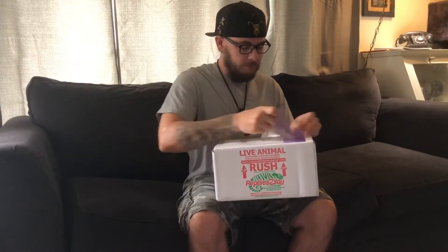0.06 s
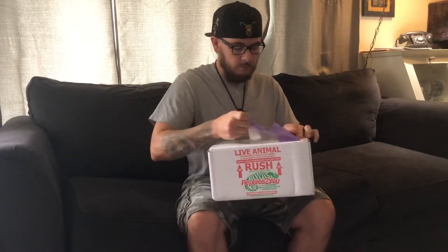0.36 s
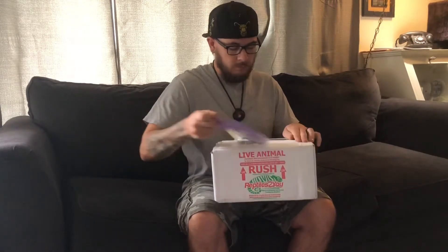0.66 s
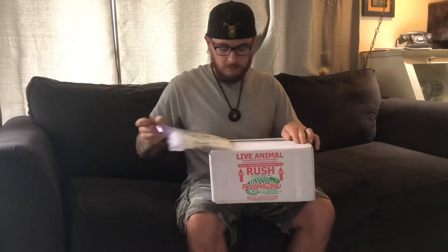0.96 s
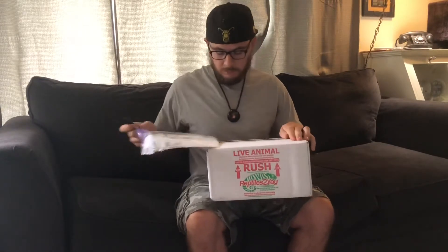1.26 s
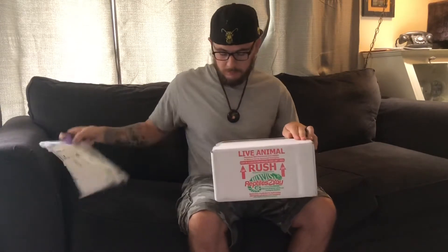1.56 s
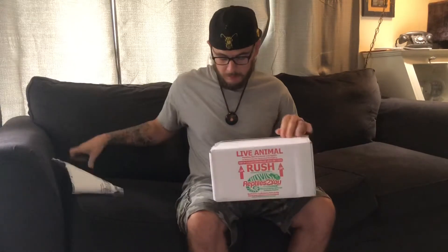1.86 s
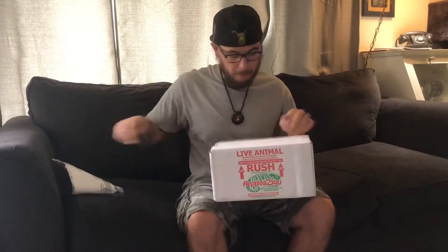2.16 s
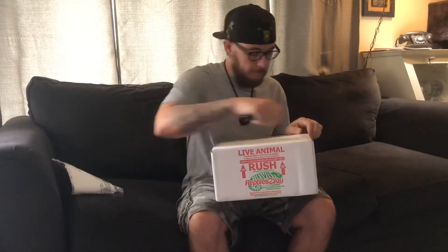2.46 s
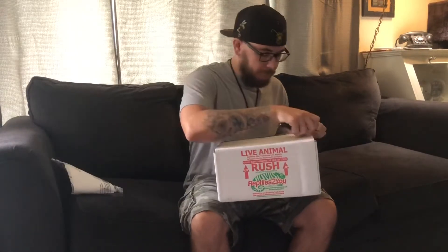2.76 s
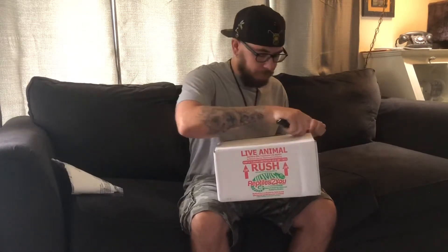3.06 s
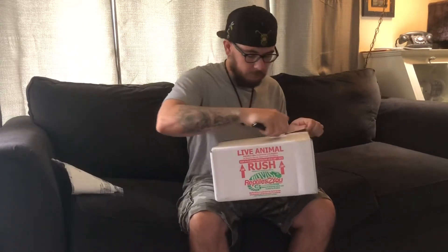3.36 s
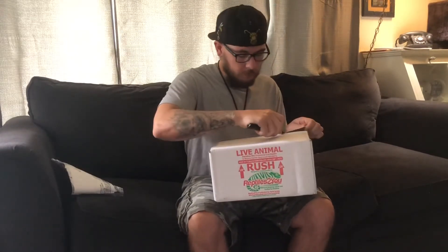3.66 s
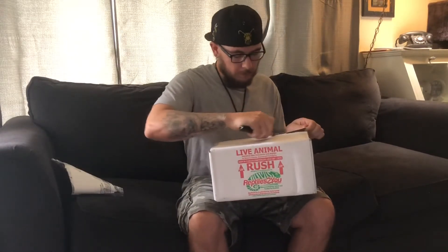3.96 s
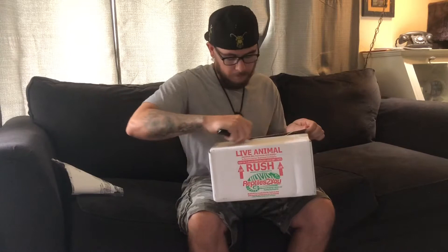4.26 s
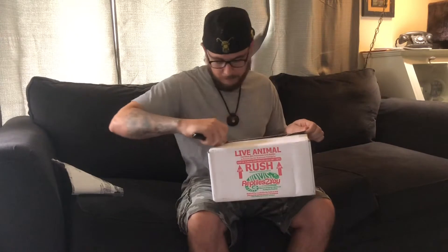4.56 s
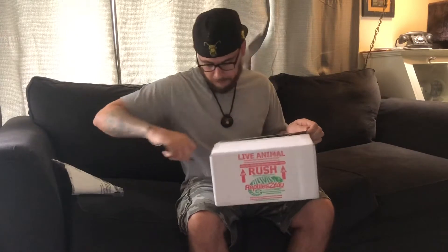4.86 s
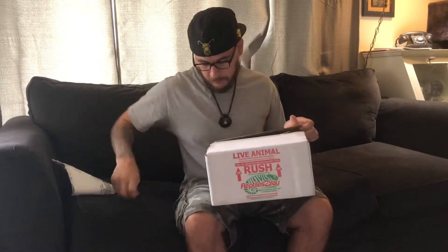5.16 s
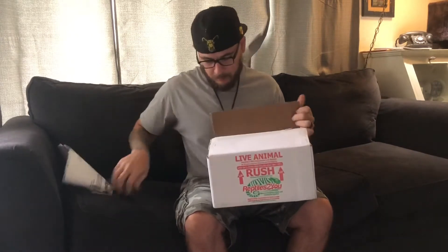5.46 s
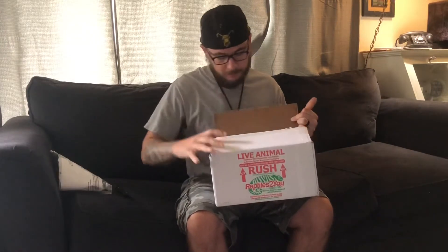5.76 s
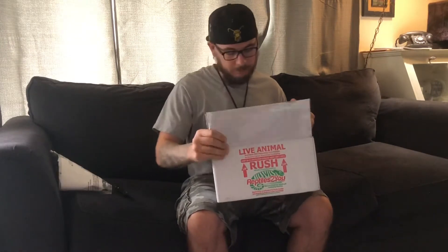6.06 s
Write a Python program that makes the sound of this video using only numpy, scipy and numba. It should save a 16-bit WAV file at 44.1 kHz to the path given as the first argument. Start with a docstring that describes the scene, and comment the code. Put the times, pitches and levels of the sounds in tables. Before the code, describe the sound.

In a small, quiet room, a loud crackling rip of packing tape shakes a cardboard box. A plastic pouch is tossed softly onto a cushion, then a folding knife locks open with a click. The blade ticks, squeaks and rasps along the taped seam until it gives with sharp snaps and hollow thumps. Palms slide lightly over the flaps. The sound is mono, with a short echo and a faint electrical hum.

```python
"""Opening a cardboard box

On a sofa in a small room, packing tape and a plastic pouch are ripped off a box; the glue crackles
as its threads snap. The pouch is tossed aside. A pocket knife clicks open, picks at the seam and
slits it. The last tape snaps, a flap pops up and hands slide over the card. Ripping and scraping
also shake the hollow box. One microphone hears it all, with a short echo and a low mains hum."""
import sys
import numpy as np
from scipy import signal
from scipy.fft import rfft, irfft
from scipy.io import wavfile
from numba import njit

SR = 44100
rng = np.random.default_rng(int(sys.argv[2]) if len(sys.argv) > 2 else 0)


def log_audio(samples):
    """Write samples as a 16-bit WAV file to the path given in sys.argv[1]."""
    # one column per channel
    frames = np.atleast_2d(samples).T
    # limit to full scale, then quantise
    limited = np.clip(frames, -1, 1)
    pcm = np.round(limited * 32767).astype(np.int16)
    wavfile.write(sys.argv[1], SR, pcm)


N = 269010
T = np.arange(N) / SR

# Levels are relative. A "share" is the width of a resonance divided by its frequency.
# the tone of each noise, from bass to treble: f/Hz, level/dB
AIR_TONE = [(12, -33.5), (20, -23), (134, -7), (172, -15.5), (310, -14.5), (388, -19), (459, -22),
            (923, -27), (1220, -25.5), (1910, -31.5), (2200, -32.5), (6360, -39.5), (7950, -41.5),
            (16000, -47.5)]
TAPE_TONE = [(300, -19.5), (1200, -4.5), (2300, -2), (3500, -1), (4600, -1.5), (5600, -3), (7500, -1.5),
             (10000, -4), (16000, -25.5)]
FIZZ_TONE = [(1500, -38), (5000, -21.5), (8200, 14.5), (11000, 9), (16000, 0)]
PLASTIC_TONE = [(300, 14), (800, 2.5), (1400, 4.5), (2200, 1.5), (4500, 1), (8000, -1.5), (12000, -4),
                (16000, -8)]
CUSHION_TONE = [(200, -6), (550, 6), (900, -0.5), (2000, -1), (3300, -7), (7000, -10.5), (11000, -15.5),
                (16000, -25)]
CARD_TONE = [(300, -27), (900, -4), (1250, 10), (1500, 13.5), (1900, 8), (5000, 5.5), (8000, 3.5),
             (12000, -1), (16000, -1)]
BLADE_TONE = [(300, -27.5), (1500, -4), (3800, -3.5), (5300, -6), (8200, -3.5), (11000, -8), (16000, -9)]
# mains hum: f/Hz, level/dB
HUM_TONES = [(59.7, -64.5), (120, -59.5), (239.5, -64.5)]
# resonances of the air and walls of the box: f/Hz, width/Hz, level/dB
HOLLOW_RINGS = [(121, 16, -14.5), (189, 35.4, 0.5)]
# resonances of the lid and of the taut tape strip: multiple of the main frequency, share, level/dB
LID_RINGS = [(1, 0.74, 6.5), (1.242, 0.18, -11), (2.701, 0.13, -3)]
STRIP_RINGS = [(0.996, 0.91, 4), (1.901, 1.0, -1)]
# how hard the tape is pulled, as the strength of its crackle: t/s, level/dB
TAPE_PULL = [(0, -21), (.06, -25), (.11, -29.5), (.135, -29.5), (.19, -28), (.26, -24), (.32, -23.5),
             (.35, -27), (.44, -23.5), (.55, -21.5), (.63, -22.5), (.86, -27.5), (.92, -28.5), (.97, -34.5),
             (1.13, -32.5), (1.21, -26.5), (1.268, -27.5)]
# the strip's pitch sinks as it grows longer and rises as it is drawn taut: t/s, f/Hz
STRIP_PITCH = [(0, 1280), (.3, 1670), (.47, 1750), (.66, 1110), (.86, 720), (1.2, 1800)]
# the lid's pitch follows the spot where the tape pulls or the blade cuts: t/s, f/Hz
PULLED_LID_PITCH = [(0, 360), (.33, 357), (.54, 410), (.72, 315), (.93, 332), (1.12, 422)]
CUT_LID_PITCH = [(3.9, 309), (4.55, 376)]
# tugs and nudges that shake the box: t/s, level/dB
TUGS = [(0, -24), (.125, -35.5), (.25, -27.5), (.615, -34), (1.207, -36.5), (2.611, -50), (4.988, -54),
        (5.355, -50)]
# clicks of tape, pouch and knife: t/s, level/dB, f/Hz, rough fade time/s
SHARP_CLICKS = [(0.1257, -10, 4000, 0.013), (0.2527, -0.5, 4500, 0.0054), (0.358, -3, 4070, .012),
                (.446, 2.5, 3600, 0.015), (.49, 1.5, 3250, 0.028), (0.9905, -8.5, 6000, 0.0062),
                (1.083, -5, 4620, 0.004), (1.457, -28.5, 6900, 0.0075), (1.5296, -27.5, 6000, 0.0062),
                (1.621, -27.5, 6570, .007), (2.415, -24, 5130, 0.011), (2.5269, -28, 3220, 0.02),
                (3.024, -27, 5060, 0.0057), (3.0734, -25, 4300, 0.039), (3.185, -27.5, 6950, 0.021),
                (3.2386, -28, 8000, 0.0077), (3.4593, -36, 6000, 0.02), (4.602, -16, 6950, 0.033),
                (4.9848, -44, 8900, 0.024), (5.129, -30.5, 6860, 0.088), (5.3584, -30, 1800, 0.012)]
# tape, blade or flap catches and squeals just below f: t/s, level/dB, half length/s, f/Hz, share
SQUEALS = [(0.303, -23.5, 0.019, 4040, 0.35), (0.52, -39, 0.017, 3430, 0.86),
           (3.323, -46.5, 0.027, 3140, 0.44), (3.503, -52, 0.012, 2320, 0.89),
           (3.874, -37, 0.0084, 3280, .18), (4.023, -32, 0.0045, 3280, 0.22),
           (5.911, -53.5, 0.021, 6430, 1.1)]
# the pouch lands on the cushion and is pushed on once: t/s, length/s, level/dB
POUCH_SKIDS = [(1.914, 0.052, -47.5), (1.989, 0.034, -44.5)]
# blade and handle ring as the knife locks open: f/Hz, level/dB, time to fade by 60 dB/s
LOCK_RINGS = [(1520, -2, .04), (2050, -5, .015), (2620, -1, .015), (3400, -3, .012), (4300, -1, .012)]
# hand and knife strokes: t/s, length/s, rise time/s, rubbing level/dB, pressing level/dB
HAND_STROKES = [(2.505, 0.069, 0.021, -60.5, -47), (2.58, 0.15, .015, -65.5, -66),
                (2.75, 0.081, 0.055, -62.5, -65), (4.73, 0.073, 0.025, -61.5, -48.5),
                (5.27, 0.14, 0.035, -62, -56), (5.525, 0.061, 0.032, -62, -43.5),
                (5.72, 0.15, 0.046, -58, -51.5), (5.83, 0.086, 0.057, -55, -55),
                (5.97, 0.095, 0.028, -63.5, -61)]
KNIFE_STROKES = [(2.94, 0.3, 0.11, -53, -56), (3.175, 0.1, 0.0065, -49, -55),
                 (3.29, 0.068, 0.041, -49, -42.5), (3.47, 0.048, 0.039, -48, -43),
                 (3.70, .14, 0.075, -56, -53), (3.825, 0.069, 0.029, -42, -39.5),
                 (3.91, 0.76, 0.017, -46, -44.5)]
# resonances of the cut card edge: f/Hz, share, level/dB
EDGE_RINGS = [(960, 1, -7), (1404, 0.44, 6), (1860, 0.87, 16), (3050, 0.23, 6)]
# the seam gives way: t/s, crack level/dB, crack f/Hz, lid level/dB, lid f/Hz, boom level/dB
SEAM_POPS = [(4.0251, -15, 2900, -18.5, 480, -45), (4.651, -12, 4770, -19, 370, -18.5),
             (5.146, -16, 7140, -17, 430, -25.5)]
# the blade flicks free of the tape: t/s, level/dB
BLADE_FLICKS = [(4.5958, 1.5), (4.606, -12)]
LID_HZ = 353  # the lid's pitch when it is rubbed or nudged


def undb(db):
    """Turn decibels into a factor to multiply a sound by."""
    return 10 ** (np.asarray(db) / 20)


def unit(x):
    """Scale a sound to an average (rms) strength of 1."""
    return x / np.sqrt(np.mean(x ** 2))


def add(out, s, sound):
    """Mix a short sound in at s seconds."""
    start = max(int(s * SR), 0)
    out[start:start + len(sound)] += sound[:N - start]


def colour(x, tone, size=1024):
    """Shape the bass and treble of a sound with a tone table; the result has strength 1."""
    hz, db = np.transpose(tone)
    f = np.maximum(np.fft.rfftfreq(size, 1 / SR), 1)
    gain = undb(np.interp(np.log(f), np.log(hz), db))
    # build the filter so that it never rings ahead of the sound
    cepstrum = irfft(np.log(gain))
    cepstrum[1:size // 2] *= 2
    cepstrum[size // 2 + 1:] = 0
    response = irfft(np.exp(rfft(cepstrum)))
    return unit(signal.oaconvolve(x, response)[:N])


@njit
def band_pass(x, tuning, share):
    """Let one band of frequencies through; its centre can move."""
    out, band, low = np.empty(len(x)), 0., 0.
    for i in range(len(x)):
        g = tuning[i]
        now = (band + g * (x[i] + 1e-18 - low)) / (1 + g * (g + share))
        band, low = 2 * now - band, low + 2 * g * now
        out[i] = share * now
    return out


def resonate(x, hz, share):
    """One resonance: the sound rings around hz, for longer if the share is small."""
    tuning = np.tan(np.pi * np.minimum(hz / SR, .45))
    return band_pass(x, tuning * np.ones(len(x)), float(share))


def resonate_twice(x, hz, share):
    """A steeper resonance that lets less through far from hz."""
    return resonate(resonate(x, hz, share), hz, share)


def wander(rate):
    """Drift at random, mostly between -1 and 1, to a new value rate times a second."""
    points = rng.standard_normal(N // 20)
    return np.interp(T * rate, np.arange(len(points)), points)


def crackle(rate, spread_db, judder_rate=12, judder_db=0):
    """Tiny snaps of uneven size, about rate a second; sticking and slipping (judder) bunches them."""
    happens = rng.random(N) < rate / SR
    size = undb(spread_db * np.minimum(rng.exponential(size=N), 4))
    sign = rng.choice([-1, 1], N)
    judder = undb(judder_db * wander(judder_rate))
    return unit(happens * size * sign * judder)


def burst(fade_s, rise=0.023):
    """A crack made of noise; the longer it lasts, the softer it starts."""
    t = T[:SR // 4]
    fade = np.exp(-np.log(1000) * t / fade_s)
    noise = 0.53 * rng.standard_normal(len(t)) * fade
    noise[0] = 1.76
    even = irfft(np.exp(1j * np.angle(rfft(noise))), len(t))  # all frequencies equally strong
    onset = 1 - np.exp(-(t + 1 / SR) / (rise * fade_s))
    crack = even * fade ** (1 / 4) * onset
    return crack * np.linalg.norm(noise) / np.linalg.norm(crack)


def gesture(s, length, rise_s, fall_s):
    """A movement that swells from time s, holds until its length is over, then dies away."""
    swell = np.sin(np.pi / 2 * np.clip((T - s) / rise_s, 0, 1)) ** 2
    return swell * np.exp(-np.maximum(T - s - length, 0) / fall_s)


def strokes(table, fall_s):
    """Two loudness curves for a series of strokes: rubbing and pressing."""
    shapes = np.array([gesture(s, length, rise_s, fall_s) for s, length, rise_s, _, _ in table])
    gains = undb(np.array(table)[:, 3:].T)
    return np.sqrt(gains ** 2 @ shapes ** 2)


def sheet(x, rings, hz):
    """A stretched sheet rings at several multiples of hz."""
    return sum(undb(db) * resonate_twice(x, hz * multiple, share) for multiple, share, db in rings)


def hollow(x):
    """The air and walls of the box boom."""
    return sum(undb(db) * resonate(x, hz, width / hz) for hz, width, db in HOLLOW_RINGS)


def box(x, lid_hz, hollow_db):
    """The lid bends and the hollow booms as the box is shaken; card soaks up the treble."""
    body = unit(sheet(x, LID_RINGS, lid_hz)) + undb(hollow_db) * unit(hollow(x))
    muffle = signal.butter(2, [90, 950], "bandpass", fs=SR, output="sos")
    return unit(signal.sosfilt(muffle, body))


def background():
    """Still room air and the hum of an appliance, there from the start."""
    air = undb(-55.5) * colour(rng.standard_normal(N), AIR_TONE, size=4096)
    hum = sum(undb(db) * np.sqrt(2) * np.sin(2 * np.pi * hz * T) for hz, db in HUM_TONES)
    return air + hum


def pulled(db, growth):
    """Loudness of one part of the rip: db at a firm pull, plus growth dB for each extra dB of pull."""
    firm_db, let_go_db_per_s = -22.5, 389
    times, pull_db = np.transpose(TAPE_PULL)
    extra_db = np.interp(T, times, pull_db) - firm_db
    since_free = np.maximum(T - times[-1], 0)
    return undb(db + growth * extra_db - let_go_db_per_s * since_free)


def tape():
    """Glue threads snap by the thousand, a few loudly; the strip and the box pass it on to the air."""
    snaps = crackle(rate=7000, spread_db=4, judder_rate=170, judder_db=1.56)
    big_snaps = crackle(rate=60, spread_db=2)
    rip = pulled(db=-22.5, growth=1.06) * colour(snaps, TAPE_TONE)
    rip += pulled(db=-34, growth=0.98) * colour(big_snaps, TAPE_TONE)
    brighten = undb(1.5 * T)  # the rip turns brighter as it runs on
    fizz = pulled(db=-23, growth=1.075) * brighten * colour(snaps, FIZZ_TONE)
    strip_hz = np.interp(T, *np.transpose(STRIP_PITCH))
    length_gain = (1337 / strip_hz) ** 2.6  # a longer, lower strip is louder
    strip = pulled(db=-35.5, growth=2.1) * length_gain * unit(sheet(snaps, STRIP_RINGS, strip_hz))
    lid_hz = np.interp(T, *np.transpose(PULLED_LID_PITCH))
    body = pulled(db=-34.5, growth=0.71) * box(snaps, lid_hz, hollow_db=-6.5)
    return rip + fizz + strip + body


def jolts():
    """The box shudders briefly at each tug or nudge."""
    shake = sum(undb(db) * gesture(s, length=0.0052, rise_s=0.0052, fall_s=0.025) for s, db in TUGS)
    return shake * box(rng.standard_normal(N), LID_HZ, hollow_db=-2.5)


def clicks():
    """Small stiff things let go, each with its own brightness."""
    out = np.zeros(N)
    for s, db, hz, fade_s in SHARP_CLICKS:
        add(out, s, undb(db) * resonate_twice(burst(fade_s), hz, share=1.6))
    return out


def squeals():
    """Tape, blade or flap sticks and slips for a moment, ringing one resonance."""
    out = np.zeros(N)
    slips = crackle(rate=2000, spread_db=10, judder_rate=380, judder_db=-5)
    for s, db, half_length, hz, share in SQUEALS:
        swell = np.exp(-((T - s) / half_length) ** 2)
        out += undb(db) * swell * unit(resonate_twice(slips, 0.98 * hz, share))
    return out


def pouch():
    """Thin plastic crinkles as it swings, then skids to rest on the cushion with a sinking flutter."""
    swing_s, land_s = 1.37, 1.922
    creases = crackle(rate=900, spread_db=1.5, judder_rate=120, judder_db=2)
    swing = gesture(swing_s, length=0.467, rise_s=0.047, fall_s=0.02)
    crinkle = undb(-54.5) * swing * colour(creases, PLASTIC_TONE)
    slide = crackle(rate=6000, spread_db=3, judder_rate=120, judder_db=2.5)
    skids = sum(undb(db) * gesture(s, length, rise_s=0.018, fall_s=0.022)
                for s, length, db in POUCH_SKIDS)
    swish = skids * colour(slide, CUSHION_TONE)
    landing = gesture(land_s, length=0.12, rise_s=0.038, fall_s=0.081)
    flutter_hz = 195.65 + 217.5 * np.exp(-np.maximum(T - land_s, 0) / 0.15)
    flutter = undb(-44) * landing * unit(resonate_twice(slide, flutter_hz, share=0.51))
    return crinkle + swish + flutter


def knife_lock():
    """The blade snaps into its lock and rings briefly."""
    out = np.zeros(N)
    t = T[:SR // 4]
    ring = sum(undb(db) * np.sin(2 * np.pi * hz * t) * np.exp(-np.log(1000) * t / fade_s)
               for hz, db, fade_s in LOCK_RINGS)
    add(out, s=2.4151, sound=undb(-42) * ring)
    return out


def hands():
    """Palms and flaps brush over the card; pressing on it shakes the box."""
    rub, press = strokes(HAND_STROKES, fall_s=0.025)
    grain = crackle(rate=5600, spread_db=4.5, judder_rate=84, judder_db=3.5)
    ticks = crackle(rate=30, spread_db=2)  # fingertips catch on the card
    swish = undb(2) * rub * colour(grain + undb(-11) * ticks, CARD_TONE)
    return swish + undb(-5.5) * press * box(grain, LID_HZ, hollow_db=3)


def knife_cuts():
    """The blade parts tape and paper in a gritty rasp; pressing brings out the card edge and the box."""
    rub, press = strokes(KNIFE_STROKES, fall_s=0.017)
    fibres = crackle(rate=9000, spread_db=3, judder_rate=200, judder_db=3)
    pitch_drift = np.exp(0.012 * wander(29))  # the edge stiffens and slackens under the blade
    edge = unit(sheet(fibres, EDGE_RINGS, pitch_drift))
    lid_hz = np.interp(T, *np.transpose(CUT_LID_PITCH))
    body = box(fibres, lid_hz, hollow_db=-3)
    ticks = crackle(rate=50, spread_db=2)  # now and then a thicker fibre gives way
    rasp = undb(1) * rub * colour(fibres + undb(-10.5) * ticks, BLADE_TONE)
    return rasp + press * (body + undb(-10) * edge)


def pops():
    """The seam cracks, then the freed lid swings and the box booms."""
    out = np.zeros(N)
    lag_s, push_s = 0.002, 0.0003  # the lid gets a short push just after the crack
    push = np.exp(-((T[:SR // 4] - lag_s) / push_s) ** 2)
    boom = hollow(push)
    for s, crack_db, crack_hz, lid_db, lid_hz, boom_db in SEAM_POPS:
        crack = burst(0.026, rise=0.0061)
        paper_knock = undb(2.5) * resonate(crack, hz=1480, share=1)
        free_ring = undb(13.5) * resonate_twice(push, lid_hz, share=0.4)  # a free lid rings longer
        swing = sheet(push, LID_RINGS, lid_hz) + free_ring
        add(out, s, undb(crack_db) * (resonate(crack, crack_hz, share=1.5) + paper_knock))
        add(out, s, undb(lid_db) * swing / np.abs(swing).max())
        add(out, s, undb(boom_db) * boom / np.abs(boom).max())
    return out


def flicks():
    """The thin blade springs back with a very short, high ping."""
    out = np.zeros(N)
    for s, db in BLADE_FLICKS:
        add(out, s, undb(db) * resonate(burst(0.003), hz=13600, share=0.69))
    return out


def reflections(fades_s):
    """A dense echo; bass, middle and treble each take their own time to fade by 60 dB."""
    t = T[:SR // 2]
    f = np.fft.rfftfreq(len(t), 1 / SR)
    noise = np.exp(2j * np.pi * rng.random(len(f)))
    bands = (f < 700, (f >= 700) & (f < 6000), f >= 6000)
    tail = sum(irfft(noise * band, len(t)) * np.exp(-np.log(1000) * t / fade_s)
               for band, fade_s in zip(bands, fades_s))
    tail *= np.clip(t / 0.0015, 0, 1)
    return tail / np.linalg.norm(tail)


def room(x, echo_db, fades_s, paths=4):
    """Near walls echo, softened by sofa and curtains; moving hands and flaps shift the echo paths."""
    weights = np.array([wander(25) for _ in range(paths)])
    weights /= np.linalg.norm(weights, axis=0)
    echo = sum(signal.oaconvolve(x * weight, reflections(fades_s))[:N] for weight in weights)
    return (x + undb(echo_db) * echo) / np.hypot(1, undb(echo_db))


def scene():
    """All the sounds together in the room, the same in both channels."""
    facing = flicks() + undb(-1) * pops()  # blade and lid also send sound straight at the microphone
    handling = tape() + pouch() + knife_lock() + knife_cuts() + hands() + jolts() + squeals() + clicks()
    in_room = room(handling + facing, echo_db=-2, fades_s=(0.32, 0.3, 0.25))
    mono = in_room + undb(-14) * facing + background()
    return np.array([mono, mono])


def record(dry):
    """Cut off the highest treble, above 15900 Hz."""
    return signal.sosfilt(signal.ellip(10, .2, 80, 15900, fs=SR, output="sos"), dry)


dry = scene()
out = record(dry)
log_audio(out)
```